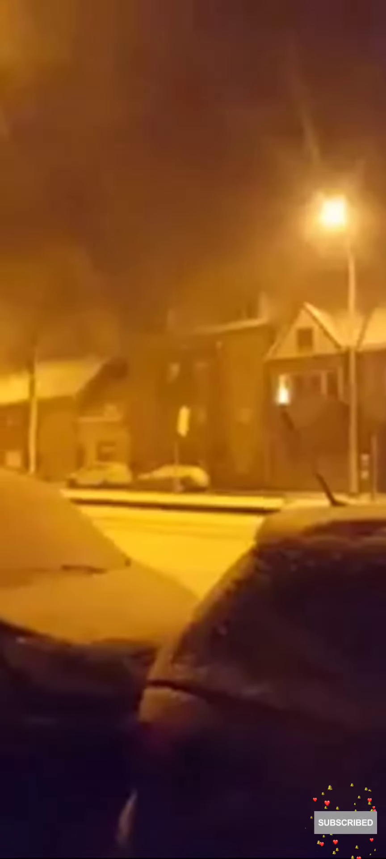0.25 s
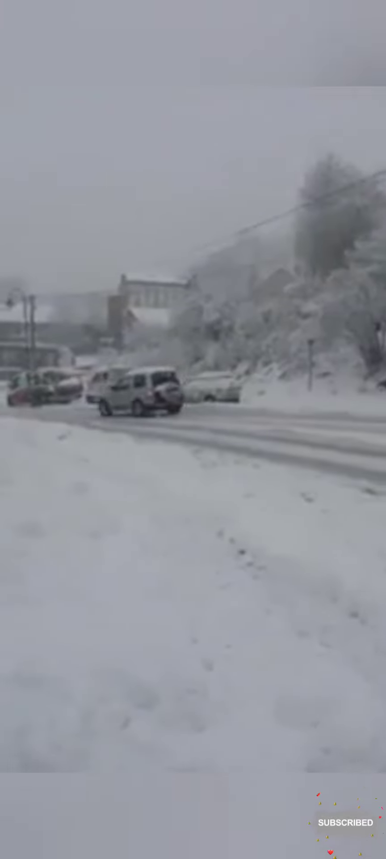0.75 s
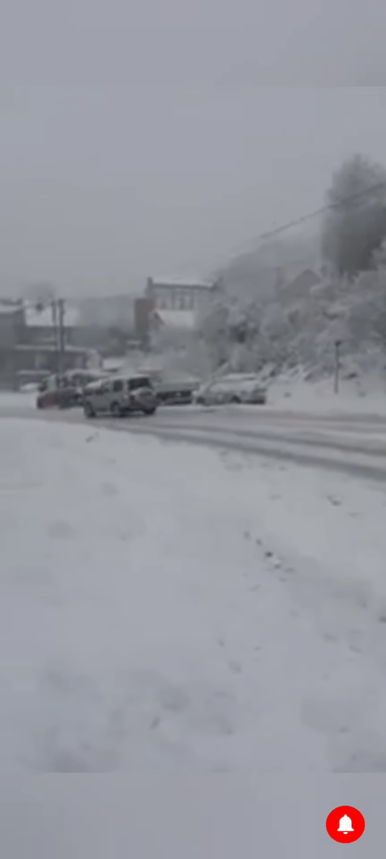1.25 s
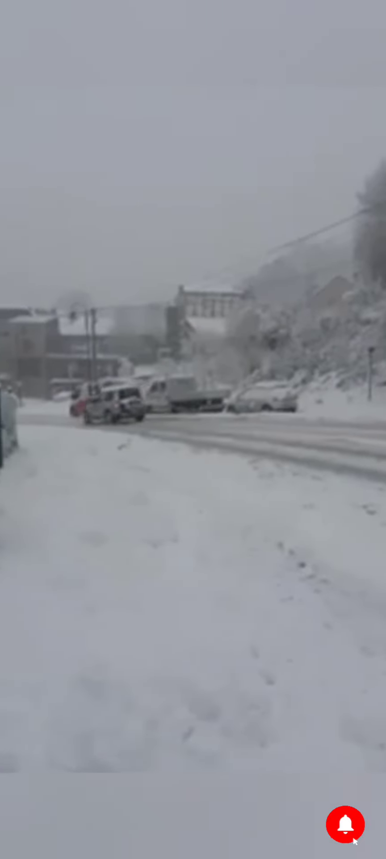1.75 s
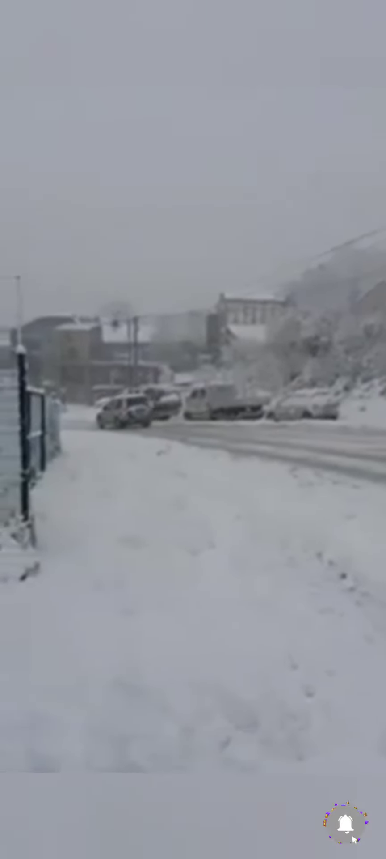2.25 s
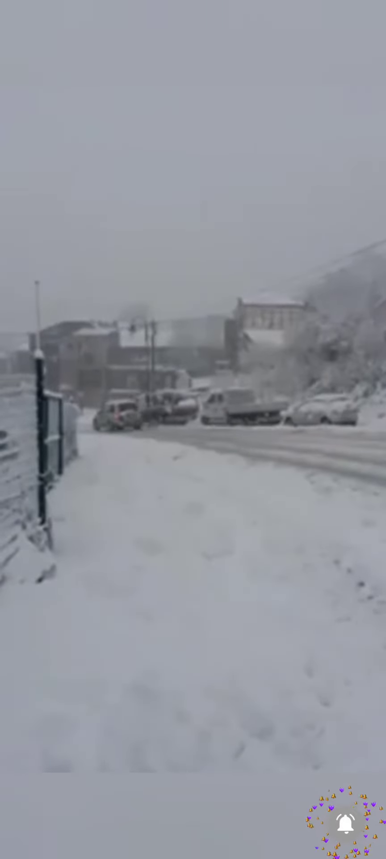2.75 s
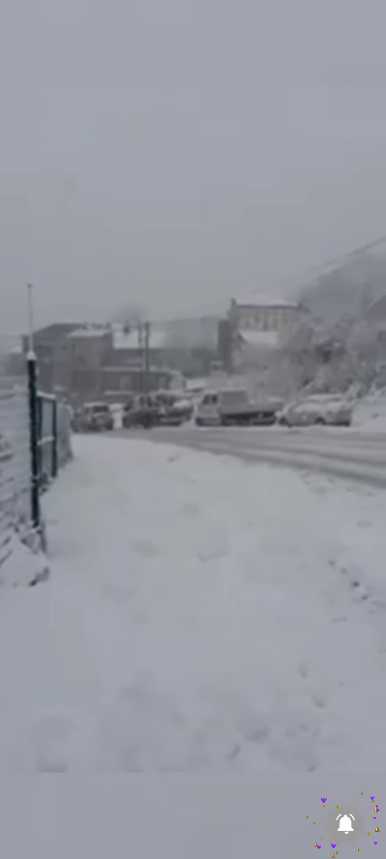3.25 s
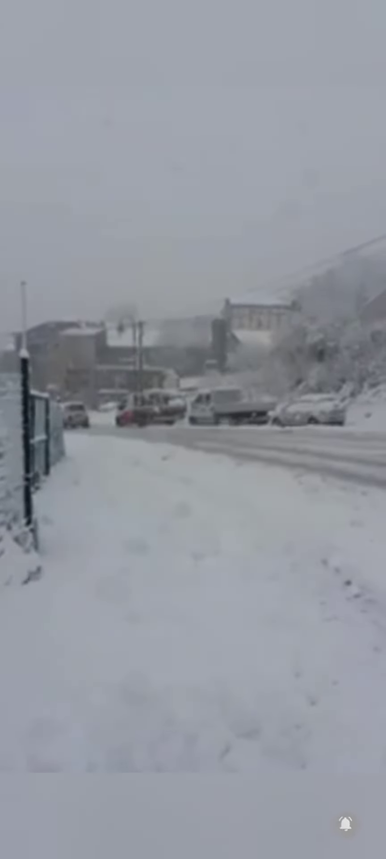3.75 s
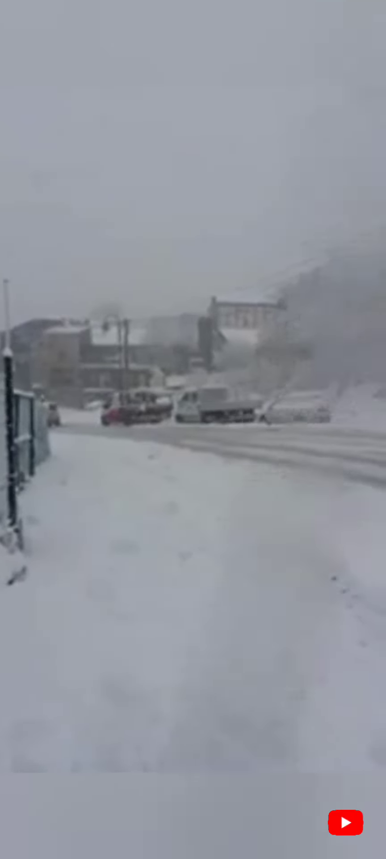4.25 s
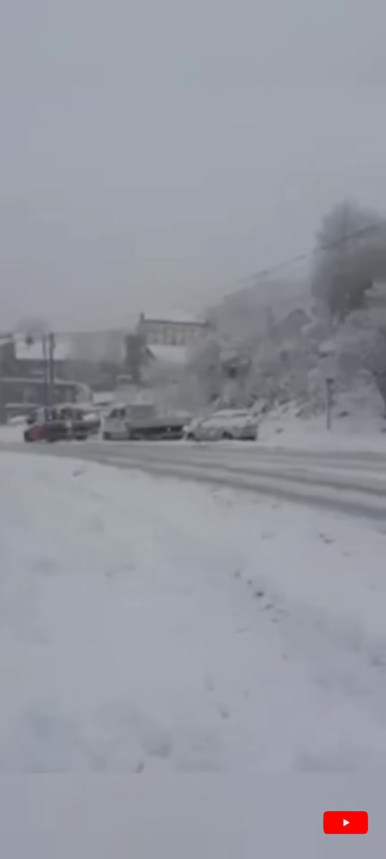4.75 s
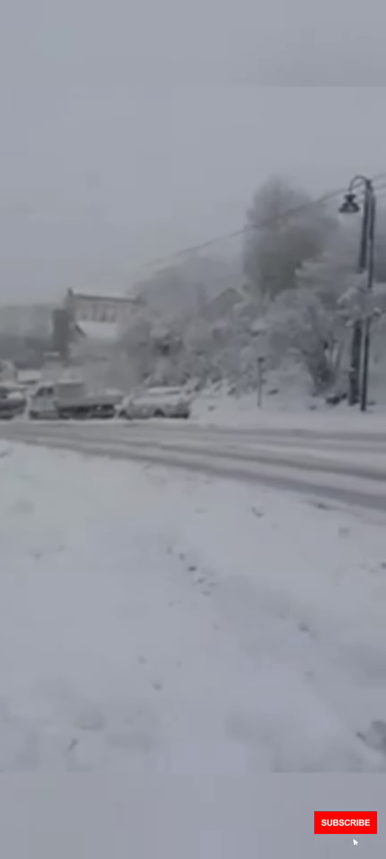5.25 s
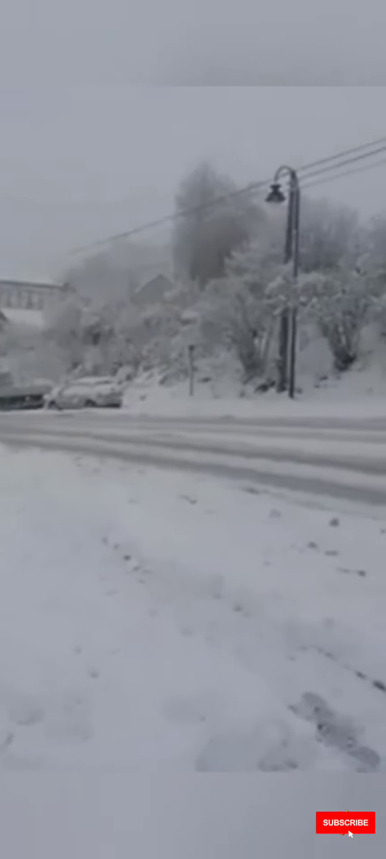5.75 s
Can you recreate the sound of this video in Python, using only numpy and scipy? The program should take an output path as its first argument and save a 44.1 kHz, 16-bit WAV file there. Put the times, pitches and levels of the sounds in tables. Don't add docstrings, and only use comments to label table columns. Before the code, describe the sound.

After quiet distant traffic and total silence, harsh wind roars across a phone mic, bumping and crackling, then gusts over an idling engine.

```python
import sys
import numpy as np
from scipy import signal
from scipy.fft import rfft, irfft
from scipy.io import wavfile
from scipy.ndimage import uniform_filter1d

SR = 44100
rng = np.random.default_rng(int(sys.argv[2]) if len(sys.argv) > 2 else 0)


def master_out(mix):
    frames = np.transpose(np.atleast_2d(mix))
    ceiling = np.clip(frames, -1, 1)
    pcm = np.round(ceiling * 32767).astype(np.int16)
    wavfile.write(sys.argv[1], SR, pcm)


def voltage_ratio(decibels):
    exponent = np.asarray(decibels, float) / 20
    return 10 ** exponent


N = 264908
T = np.arange(N) / SR
HZ = np.fft.rfftfreq(N, 1 / SR)

TAP_S, NIGHT_ENDS_S, STORM_STARTS_S, STORM_ENDS_S = 0.2565, 0.3075, 0.9395, 6.006
# pitch_hz, level_db (per Hz)
NIGHT_SPECTRUM = [(20, -60), (59, -5.5), (220, -13), (250, -7), (340, -15), (710, -16), (1870, -23),
                  (2840, -34.5), (4500, -39), (6500, -46), (8200, -34), (10000, -45), (13000, -42),
                  (15600, -46)]
# start_s, level_db
NIGHT_LEVEL = [(0.0, -50.5), (0.122, -45.5), (0.236, -49), (0.252, -47.5), (0.306, -44)]
# pitch_hz, level_db (per Hz)
BRUSH_SPECTRUM = [(1760, -35), (3000, -5), (6270, -16), (6810, -14), (7980, 0), (14800, -5.5), (15600, -8)]
# pitch_hz, level_db, t60_s
TAP_MODES = [(300, -34, .007), (650, -35, .006), (1050, -34, .006), (1500, -32, .007), (2400, -36, .005),
             (3300, -39, .005), (4600, -38, .006), (6500, -43, .004), (8300, -39, .006), (10200, -43, .004),
             (11800, -39, .005), (14000, -44, .004)]

# pitch_hz, level_db
ENGINE_ORDERS = [(40.0, 0), (100.0, -11.5)]
# pitch_hz, width_hz, level_db
EXHAUST_LINES = [(67.7, 8.4, -0.5), (134, 7.2, -13), (163.4, 30, -24), (29, 4.4, -7)]
# peak_s, level_db, length_s
EXHAUST_SURGES = [(1.91, -39.5, 0.13), (2.202, -49, .05), (2.454, -42, 0.1), (2.793, -47.5, 0.094),
                  (2.993, -43, 0.084), (3.32, -44, 0.19), (3.69, -44.5, 0.072), (3.952, -45, 0.084),
                  (4.196, -45, 0.096), (4.64, -45.5, 0.22), (5.315, -44.5, 0.15), (5.707, -41.5, .07),
                  (5.9, -50.5, 0.095)]
# pitch_hz, level_db (per Hz)
ROAD_RUMBLE = [(15, -40), (28, 14.5), (60, -3.5), (120, 2), (200, -1.5), (260, -56)]
HUM_DB, THROB_DB = -44.5, -57.5

# peak_s, thud_db, length_s, push_db (on the roar)
HAND_BUMPS = [(0.977, -48, 0.021, 5.5), (1.012, -46, .03, -1), (1.094, -24, 0.019, 14.5),
              (1.13, -30, 0.027, 7), (1.166, -26, 0.021, 7.5), (1.231, -24.5, 0.07, 7),
              (1.301, -32, 0.015, 15), (1.376, -45, 0.027, 2.5), (1.41, -52, 0.017, 12.5),
              (1.441, -42, 0.0097, 6.5), (1.481, -51, .035, 10.5), (1.559, -50, 0.056, 8.5),
              (3.032, -32, 0.013, 15)]
# low_hz, high_hz
CASE_BAND = (520, 1350)
# start_s, level_db
CRACKLE_LEVEL = [(1.08, -58.5), (1.10, -47), (1.15, -52.5), (1.26, -56), (1.30, -60)]
# start_s, level_db
WHISTLE_LEVEL = [(.94, -38), (.965, -33), (.98, -18), (1.04, -21), (1.062, -28), (1.07, -40), (1.6, -45),
                 (1.9, -50), (2.0, -70)]
# peak_s, bright_db, dull_db, knock_hz
FLAKE_STRIKES = [(1.0836, -0.5, -14.5, 2380), (1.108, -22, -11.5, 1950), (1.2203, -11, -11, 1960),
                 (1.2905, -5.5, -12.5, 2140), (1.4, -10, -16, 1910), (1.4372, -12.5, -21.5, 1830),
                 (1.471, -14, -25, 1750), (1.5358, -15, -14.5, 1655), (1.628, -42, -23, 1870),
                 (1.9078, -34, -25, 2300), (2.029, -19, -41, 2140), (2.2455, -16, -30, 2500),
                 (2.719, -15.5, -36, 1960), (2.7468, -13, -42, 2500), (2.932, -27, -19, 2250),
                 (3.021, -5, -17.5, 1880), (3.1382, -9.5, -24, 2560), (3.2495, -29.5, -20, 2500),
                 (3.3997, -30, -16, 2530), (3.688, -16, -21.5, 2450), (4.0592, -20, -12.5, 1790),
                 (4.2677, -16, -20.5, 2460), (4.308, -15.5, -12, 2140), (4.6735, -13.5, -31, 1800),
                 (4.8028, -7.5, -39, 1530), (5.517, -14, -41, 1980), (5.5243, -13, -36, 2340),
                 (5.627, -11, -37, 2240), (5.883, -12, -38, 1780), (5.919, -7.5, -28, 2480)]

# pitch_hz, level_db (per Hz)
PORT_COLOUR = [(150, -20), (290, -3), (600, -6), (950, -15.5), (1500, -6.5), (1980, -2.5), (2600, -4),
               (2950, -15), (3700, -14), (5250, -12), (6000, -21.5), (8250, 0.5), (10500, -14.5),
               (13400, -19)]
# width_hz, depth_db
SIDE_CAVITY = (240, -15)
REGION_EDGES = (6130, 3100, 1000, 120)
# start_s, strength_db, turn_db (port turned from the wind, as dullness)
FIRST_PUFF = [
    (0.941, -35, 0.83),
    (0.969, -33.5, 2.4),
    (0.981, -26.5, -1.4),
    (1.072, -26.5, -2.2),
]
# start_s, strength_db, turn_db
FIRST_BLAST = [(1.09, -29, 5), (1.149, -14.5, -3.5), (1.196, -22, 4.5), (1.238, -9.5, -9), (1.3, -11.5, -5),
               (1.33, -11, -5), (1.49, -17, -1), (1.55, -22, -3)]
# start_s, strength_db, turn_db
LATER_WIND = [(1.58, -25.5, -0.5), (1.67, -32, 3), (2.0, -32, 5), (2.49, -28, 4), (2.68, -28, 1.5),
              (2.9, -26, 1), (3.1, -28.5, 0), (3.6, -30.5, 1), (3.9, -30.5, 1.5), (4.15, -30, 0.5),
              (4.52, -36.5, 2.5), (4.7, -36, -0.5), (4.9, -26, -7.5), (5.1, -32.5, -2), (5.46, -33, -1.5),
              (5.6, -29.5, -3.5), (5.78, -31, -2.5), (6.0, -28.5, -4)]
# peak_s, level_db, rise_s, fall_s, throat_share (ratio to the throat cavity)
WIND_GUSTS = [(2.04, 2, 0.012, 0.12, 0.033), (2.23, 5, 0.1, 0.084, 0.34), (2.35, 2, 0.017, 0.017, 2.1),
              (2.72, 2.5, 0.018, 0.2, 0.033), (2.925, 1.5, .06, 0.025, 2.6),
              (3.029, 7.5, .012, 0.044, 0.47), (3.36, 6, 0.083, 0.044, 0.6), (3.46, 7, 0.053, 0.055, 0.43),
              (3.6, 1.5, 0.075, 0.081, 3.8), (3.79, 6, 0.046, 0.16, 0.033), (4.225, -4, 0.028, 0.03, .3),
              (4.41, 8.5, 0.08, 0.21, 0.34), (4.555, -5, 0.047, 0.016, 1.5), (4.6, 0.5, 0.019, 0.022, 0.58),
              (4.75, 3.5, 0.039, 0.024, .2), (4.803, 7, 0.0031, 0.018, .1), (5.15, 5.5, 0.044, 0.024, 0.62),
              (5.25, 3.5, 0.023, 0.04, 0.5), (5.38, 6, .07, 0.044, 0.18), (5.55, 6, 0.01, 0.048, .6),
              (5.69, 11, .05, 0.044, 0.88), (5.78, 6.5, 0.013, 0.011, .6), (5.92, 6, 0.1, 0.06, 0.9)]
# level_db, then response (dB per dB) to light_wind, turn, gusts, throat,
# dropout, hand
REGION_RESPONSE = [
    (0, 1.0, 0.063, 0.96, 0, 1.1, 0.012),
    (-10.5, 0.88, 0.38, 0.43, 0.68, 0.84, 0.12),
    (-0.57, 0.98, 0.85, 0.028, 0.88, 0.82, 0.18),
    (-12, 0.45, 0.18, .05, 0.34, 0.18, 0.92),
    (-19, 0.53, 1, .05, 0.24, 0.36, 0.82),
]
# peak_s, rise_s, fall_s
BLAST_CORE = (1.22, 0.12, 0.091)
STRONG_DB = -26.5

# start_s, level_db
GAIN_CONTROL = [
    (1.07, 1.2),
    (1.2, -4),
    (1.29, -11.5),
    (1.56, -11),
    (2.5, -11),
    (3.1, -1),
    (5.5, 1.5),
    (6.0, 0),
]
# pitch_hz, level_db (against the usual strength there)
SQUELCH_THRESHOLD = [(200, -16), (9000, -19), (10500, -11), (12000, -6), (13200, 1.5), (13900, 19),
                     (14500, 26), (16000, 40)]
# start_s, added_db
TREBLE_STARVING = [(1.22, 8), (1.3, 26), (1.55, 12), (1.62, 4), (3.7, 7), (4.4, 0.5), (6.0, 0)]


def evened(x):
    return x / np.sqrt(np.mean(x ** 2) + 1e-20)


def noise():
    return rng.standard_normal(N)


def read(points, hz):
    f, value = np.transpose(points)
    return np.interp(np.log(hz + 1), np.log(f + 1), value)


def curve(rows, column=1, outside=-120):
    rows = np.array(rows)
    return np.interp(T, rows[:, 0], rows[:, column], outside, outside)


def swell(s, rise, fall):
    width = np.where(T < s, max(rise, 0.002), max(fall, 0.002))
    return np.exp(-((T - s) / width) ** 2)


def chance(hz):
    return evened(irfft(rfft(noise()) / (1 + (HZ / hz) ** 2), N))


def band_db(lo_hz, hi_hz):
    return -10 * np.log10((1 + (lo_hz / (HZ + 1)) ** 24) * (1 + (HZ / hi_hz) ** 24))


def response(db):
    gain_db = np.interp(np.fft.rfftfreq(8192, 1 / SR), HZ, db)
    log_gain = np.log(voltage_ratio(np.maximum(gain_db, -100)))
    circle = np.r_[log_gain, log_gain[-2:0:-1]]
    return np.fft.ifft(np.exp(np.conj(signal.hilbert(circle)))).real[:4096]


def coloured(x, db):
    return signal.oaconvolve(x, response(db))[:N]


def street():
    traffic = evened(coloured(noise() * voltage_ratio(1.3 * chance(hz=30)), read(NIGHT_SPECTRUM, HZ)))
    return voltage_ratio(curve(NIGHT_LEVEL, outside=None)) * traffic


def finger_tap():
    since = np.maximum(T - TAP_S, 0)
    ring = np.zeros(N)
    for hz, db, t60 in TAP_MODES:
        fade = voltage_ratio(np.maximum(db - 60 * since / t60, -200))
        ring += fade * np.sin(2 * np.pi * (hz * since + rng.random()))
    tap = ring * np.minimum(since / 0.0014, 1) * voltage_ratio(7)
    brush = evened(coloured(noise(), read(BRUSH_SPECTRUM, HZ))) * voltage_ratio(-60)
    return tap + brush * (T > TAP_S + 0.005)


def engine():
    orders = np.zeros(N)
    for hz, db in ENGINE_ORDERS:
        orders += voltage_ratio(db) * np.sqrt(2) * np.sin(2 * np.pi * (hz * T + rng.random()))
    rumble = evened(irfft(rfft(noise()) * voltage_ratio(read(ROAD_RUMBLE, HZ)), N))
    shape = sum(voltage_ratio(db) / (1 + (2 * (HZ - hz) / width) ** 2) for hz, width, db in EXHAUST_LINES)
    throbs = evened(irfft(rfft(noise()) * shape, N))
    throbs = evened(throbs / uniform_filter1d(abs(throbs), size=1300) ** 0.58)
    surges = sum(voltage_ratio(db) * swell(s, length, length) for s, db, length in EXHAUST_SURGES)
    hum = voltage_ratio(HUM_DB) * (orders + voltage_ratio(-6.5) * rumble)
    return voltage_ratio(curve(GAIN_CONTROL, outside=None)) * (hum + (voltage_ratio(THROB_DB) + surges) * throbs)


def hand():
    thuds = evened(coloured(noise() * voltage_ratio(2.5 * chance(hz=25)), band_db(46, 290)))
    return thuds * sum(voltage_ratio(db) * swell(s, 0.9 * length, length) for s, db, length, _ in HAND_BUMPS)


def dropout_db():
    since = T - 0.98
    hold_s, back_s = 0.014, 0.022
    return -48 * np.clip(since / 0.0013, 0, 1) * np.exp(-np.maximum(since - hold_s, 0) / back_s)


def regions_db():
    rows = FIRST_PUFF + FIRST_BLAST + LATER_WIND
    strength = curve(rows, outside=None) - STRONG_DB
    light_wind = np.minimum(strength, 0)
    turn = curve(rows, column=2, outside=None)
    gusts, throaty = np.zeros((2, N))
    for s, db, rise, fall, share in WIND_GUSTS:
        gust = db * swell(s, rise, fall)
        gusts += gust
        throaty += share * gust
    pushes = sum(db * swell(s, length, length) for s, _, length, db in HAND_BUMPS)
    controls = np.array([np.ones(N), light_wind, turn, gusts, throaty, dropout_db(), pushes])
    shared_db = curve(GAIN_CONTROL, outside=None) + STRONG_DB + np.maximum(strength, 0)
    return shared_db + np.array(REGION_RESPONSE) @ controls


def case_body(level_db):
    rush = evened(coloured(noise() * voltage_ratio(1.3 * chance(hz=41.3)), band_db(*CASE_BAND)))
    return voltage_ratio(level_db + 6.5 * swell(*BLAST_CORE)) * rush


def airy_top(hiss_db):
    air = evened(coloured(noise(), 3 * band_db(13800, 15700)))
    level_db = -47.5 + 1.5 * (hiss_db + 20) - 16 * (T < 0.99) + 2.5 * chance(hz=60)
    return voltage_ratio(level_db) * (T < 1.565) * air


def treble_crackle():
    snaps = (rng.random(N) < 260 / SR) * noise()
    return voltage_ratio(curve(CRACKLE_LEVEL)) * evened(coloured(snaps, band_db(11500, 14800)))


def port_whistle():
    pitch_hz = 8850 + 40 * chance(hz=100)
    return voltage_ratio(curve(WHISTLE_LEVEL) + dropout_db()) * np.sin(2 * np.pi * np.cumsum(pitch_hz) / SR)


def port_db():
    width, db = SIDE_CAVITY
    return read(PORT_COLOUR, HZ) + db / (1 + (2 * (HZ - REGION_EDGES[0]) / width) ** 2)


def flake_strikes():
    rise_s, t60_s = 0.0007, 0.017
    t = np.arange(1800) / SR
    port = response(port_db() + band_db(3100, 13600) + 6e-4 * HZ)[:len(t)]
    click = 4.5 * (abs(t - rise_s) < 0.5 / SR)
    fade = voltage_ratio(-60 * t / t60_s)
    out = np.zeros(N + 8000)
    for s, bright_db, dull_db, knock_hz in FLAKE_STRIKES:
        knock = np.sin(2 * np.pi * knock_hz * t) * voltage_ratio(-60 * t / 0.011) * np.minimum(t / 0.00057, 1)
        start = round((s - rise_s) * SR)
        for ring, db in ((port, bright_db), (knock, dull_db + 2.0)):
            puff = rng.standard_normal(len(t)) * np.minimum(t / rise_s, 1)
            sound = signal.fftconvolve((puff + click) * fade, ring)
            out[start:start + len(sound)] += voltage_ratio(db) * sound / abs(sound).max()
    return out[:N]


def wind(levels_db):
    eddies_db = 0.29 * chance(hz=9.7) + 0.79 * chance(hz=62.3) + 1.0 * chance(hz=250)
    sizes = voltage_ratio(5.0 * np.minimum(rng.exponential(1, N), 3.6))
    flakes = evened((rng.random(N) < 600 / SR) * sizes * rng.choice([-1, 1], N))
    pelting = 1 + 1.1 * swell(*BLAST_CORE)
    edges = (14300,) + tuple(REGION_EDGES)
    # share of common eddies, own lumps in dB, flake grit
    textures = [(1.0, 0.55, 0.25), (0.74, 0.62, 0.59), (0.73, 0.46, 0.53), (0.45, 0.42, 0.072)]
    out = np.zeros(N)
    for k, (share, own_db, grit) in enumerate(textures):
        turbulence = noise() * voltage_ratio(share * eddies_db + own_db * chance(hz=30.7))
        air = turbulence + grit * flakes * pelting
        region = evened(coloured(air, port_db() + band_db(edges[k + 1], edges[k])))
        out += voltage_ratio(levels_db[k]) * region
    return out


def squelch(x):
    hz, t, z = signal.stft(x, SR, nperseg=1024, noverlap=768)
    patches, whims = rng.standard_normal((len(t), len(hz), 2)).T
    patches = uniform_filter1d(uniform_filter1d(patches, size=7, axis=0), size=14, axis=1)
    z = z * voltage_ratio(1.63 * evened(patches))
    power = abs(z) ** 2 + 1e-16
    loud = power[(hz > 6200) & (hz < 11000)].mean(0)
    middle = np.median(loud)
    usual = np.median(power / loud, 1, keepdims=True) * middle * (loud / middle) ** 0.71
    strip = uniform_filter1d(uniform_filter1d(power, size=3, axis=0), size=5, axis=1)
    starved_db = np.outer(hz > 11500, np.interp(t, *np.transpose(TREBLE_STARVING)))
    whims = np.repeat(np.repeat(whims, 8, 0), 6, 1)[:len(hz), :len(t)]
    whims_db = 6.5 * whims * np.clip(hz / 12000, 0, 1)[:, None] ** 2
    threshold_db = read(SQUELCH_THRESHOLD, hz)[:, None] + starved_db + whims_db
    kept = strip > usual * voltage_ratio(2 * threshold_db)
    contrast = (power / uniform_filter1d(power, size=15, axis=0)) ** 0.1
    return signal.istft(z * kept * contrast, SR, nperseg=1024, noverlap=768)[1][:N]


def overload(x):
    return x / (1 + (x / 0.63) ** 14) ** (1 / 14)


def storm():
    levels_db = regions_db()
    hiss_db, body_db = levels_db[0], levels_db[-1]
    rush = squelch(case_body(body_db) + flake_strikes() + wind(levels_db))
    overtones = airy_top(hiss_db) + treble_crackle() + port_whistle()
    return overload(engine() + hand() + overtones + rush)


def scene():
    first = np.clip((NIGHT_ENDS_S - T) / 0.0012, 0, 1)
    starts = np.clip((T - STORM_STARTS_S) / 0.0011, 0, 1)
    ends = np.clip((STORM_ENDS_S - T) / 0.00058, 0, 1)
    return (first * (street() + finger_tap()) + starts * ends * storm())[None]


def roll_off(x):
    return signal.sosfilt(signal.butter(12, 15710, fs=SR, output="sos"), x)


def record(dry):
    return roll_off(dry)


dry = scene()
out = record(dry)
master_out(out)
```